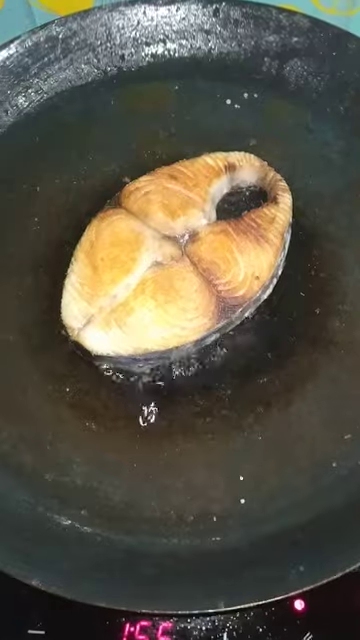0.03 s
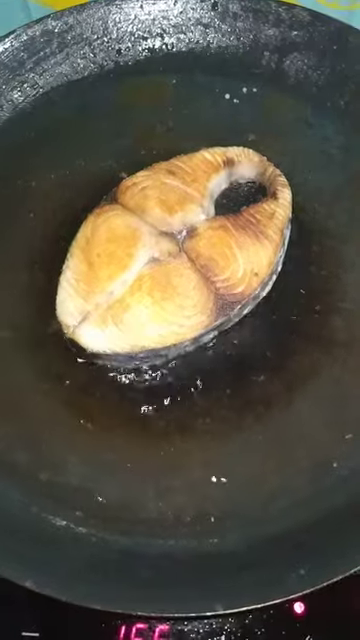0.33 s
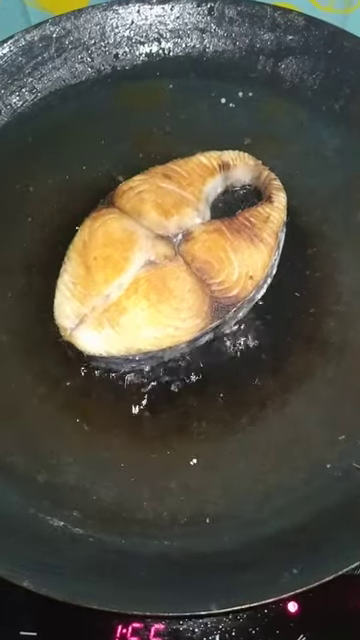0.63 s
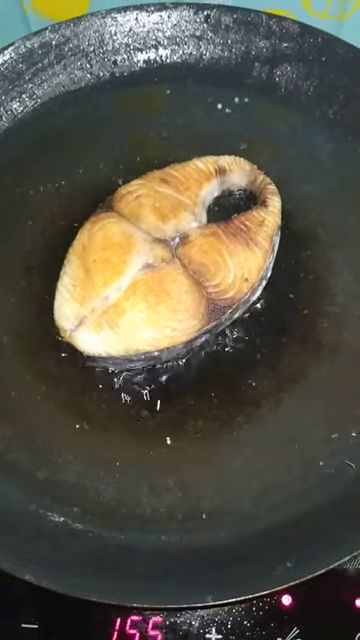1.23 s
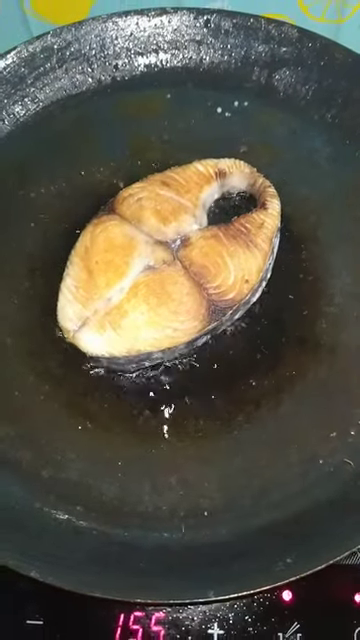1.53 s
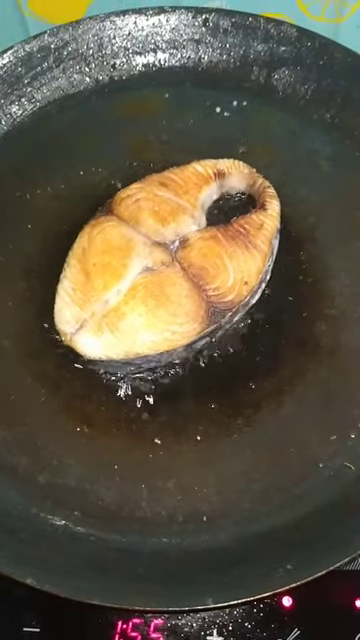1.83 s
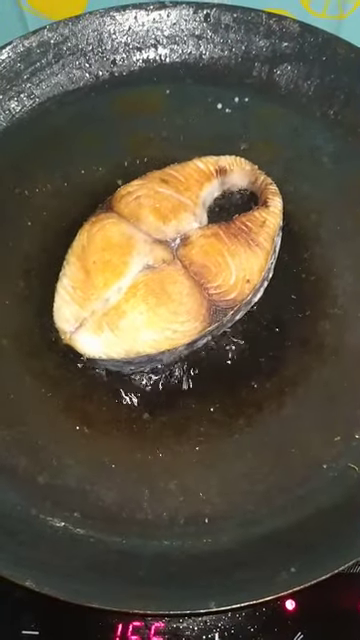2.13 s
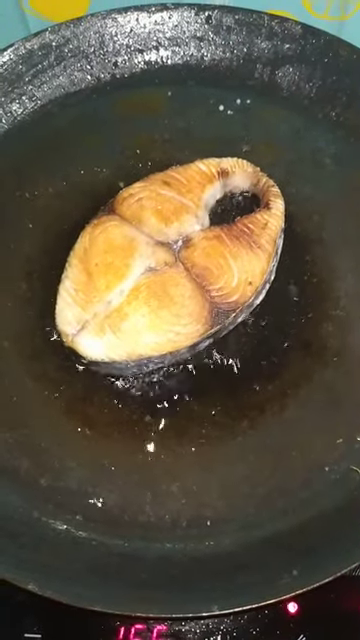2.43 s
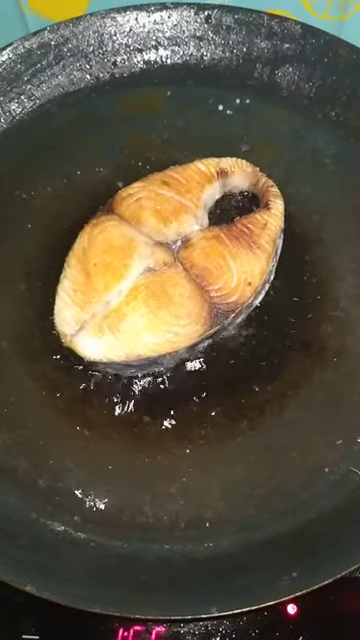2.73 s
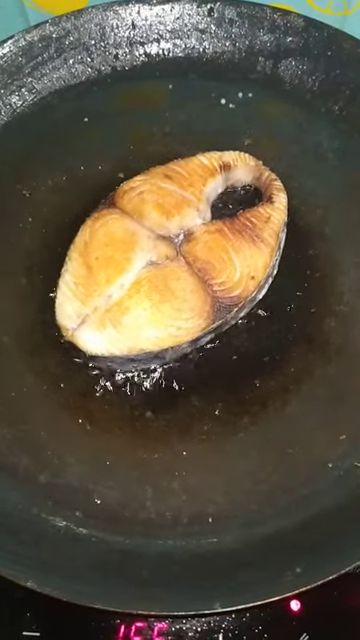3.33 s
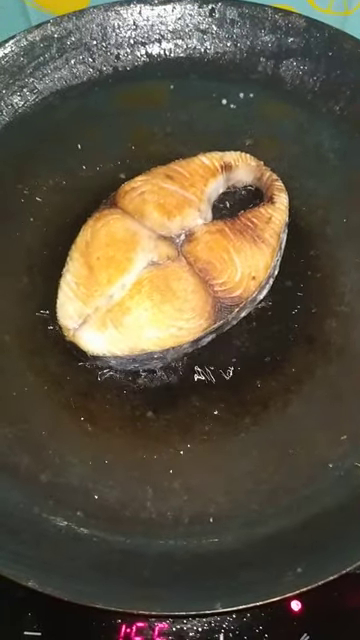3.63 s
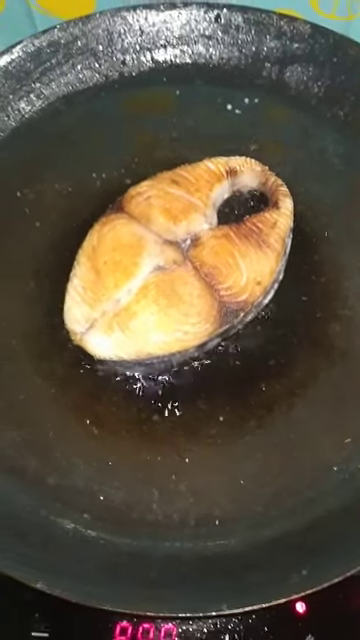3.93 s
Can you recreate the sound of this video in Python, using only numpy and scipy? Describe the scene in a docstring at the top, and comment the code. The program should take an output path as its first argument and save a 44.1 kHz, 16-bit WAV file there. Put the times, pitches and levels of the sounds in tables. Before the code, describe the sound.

Oil sizzles around a fish steak in a pan, starting with a soft microphone thump at about 0.3 seconds. The close, bright fizz continues until 4 seconds, full of sharp ticks and small spitting pops. Louder snaps with fine spray come irregularly from about 1.3 seconds, clustering near 2 and 3 seconds. Duller bubbling and a faint cooktop fan and hum lie underneath, with slight kitchen reverberation.

```python
"""Shallow oil sizzles around a fish steak in a steel pan, heard from just above.
Tiny steam bubbles burst in a dense fizz, bigger ones crack and ring as resonant cavities, blisters
snap and spray, and trapped water spits with a lower pop. Duller bubbles work under the fish.
The pan and the kitchen reflect it all, over the cooktop's fan and mains hum.
The microphone switches on with a soft thump; its two ports resonate in the treble."""
import sys
import numpy as np
from scipy import signal
from scipy.fft import rfft, irfft
from scipy.io import wavfile
from scipy.ndimage import map_coordinates

SR = 44100
rng = np.random.default_rng(int(sys.argv[2]) if len(sys.argv) > 2 else 0)


def store_pcm(level_fs):
    """Save levels as 16-bit WAV."""
    pcm = np.round(np.clip(level_fs, -1, 1) * 32767).astype(np.int16)
    wavfile.write(sys.argv[1], SR, np.atleast_2d(pcm).T)


N = 176400

FIZZ_PER_S, FIZZ_SPREAD_DB = 5000, 4.5
CLICK_S = 0.0011  # the level of a crack or snap is that of its energy spread over this time


def amp(db):
    """Decibels to amplitude ratio."""
    return 10 ** (np.asarray(db) / 20)


def unit(x):
    """Normalisation to rms 1."""
    return x / np.sqrt(np.mean(x ** 2) + 1e-20)


def along(points, hz, column=1):
    """Interpolation of a table column on a logarithmic frequency axis."""
    rows = np.array(points)
    return np.interp(np.log(hz + 1), np.log(rows[:, 0] + 1), rows[:, column])


def ears(balance_db):
    """Constant-power panning; the balance is the left level minus the right."""
    gains = np.array([[amp(balance_db)], [1]])
    return gains / np.linalg.norm(gains)


def wobble(per_s):
    """Smooth random modulation: a spline through Gaussian knots."""
    knots = rng.standard_normal(int(N * per_s / SR) + 4)
    return map_coordinates(knots, [np.arange(N) * per_s / SR])


def coloured(x, gain_db):
    """Minimum-phase filtering, at energy 1, with the spectral shape gain_db(hz)."""
    size = 4096
    cepstrum = irfft(np.log(amp(gain_db(np.fft.rfftfreq(size, 1 / SR)))))
    cepstrum[1:size // 2] *= 2  # folding makes the response causal
    cepstrum[size // 2 + 1:] = 0
    response = irfft(np.exp(rfft(cepstrum)))
    return signal.fftconvolve(x, response / np.linalg.norm(response))[:len(x)]


def add(track, s, sound):
    """Superposition of a stereo sound on the track at time s."""
    part = track[:, max(0, round(s * SR)):][:, :sound.shape[1]]
    part += sound[:, :part.shape[1]]


def ports(pair):
    """Resonance of the two microphone ports colours the bursts; each channel leaves at rms 1."""
    # port response: f/Hz, left/dB, right/dB
    response = [(407, -8.5, 0.7), (930, 1.5, 7), (1250, -8.5, -3.5), (1600, 0.2, 4.5), (2130, -3.5, -10),
                (2480, 4.5, 2.5), (3360, -1.5, -2.5), (4320, 1, 3.5), (4700, -2.5, -0.5), (5760, -4, 4.5),
                (7430, -1.5, 8.5), (8150, 1.5, 17.5), (8820, 6, 16), (10000, 6, 10), (11400, 10, 9),
                (12700, 4.5, -15), (14060, -4.5, -2.5), (15200, -7.5, -10)]
    tilt = [(40, -24.5), (500, -6), (2500, -1.5), (6000, 1)]  # tiny bursts lack bass: f/Hz, level/dB
    return np.array([unit(coloured(x, lambda hz: along(response, hz, column) + along(tilt, hz)))
                     for column, x in enumerate(pair, start=1)])


def cooktop():
    """Broadband fan noise, partly coherent between the ears, plus phase-modulated mains and blade tones."""
    # fan spectrum: f/Hz, relative level/dB
    fan = [(20, -0.5), (45, -10), (75, -10), (125, -9), (170, -4.5), (300, -6), (390, 4), (600, -4.5),
           (1200, -8), (3000, -8), (9000, -53)]
    # mains and blade tones: f/Hz, left/dB, right/dB
    hum = [(99.4, -59, -59.5), (276.7, -51, -70.5), (479, -60.5, -51), (561, -59, -55.5), (619, -56, -57.5),
           (781, -60, -78), (1220, -78, -71), (1602, -58.5, -58.5)]
    fan_db, width = -45, 0.26
    t = np.arange(N) / SR
    mid, side = (unit(coloured(x, lambda hz: along(fan, hz))) for x in rng.standard_normal((2, N)))
    out = amp(fan_db) * np.array([mid + width * side, mid - width * side])
    for hz, left_db, right_db in hum:
        waver_rad = 0.85 * hz / 400 * wobble(per_s=14)
        out += np.sqrt(2) * amp([[left_db], [right_db]]) * np.sin(2 * np.pi * hz * t + waver_rad)
    return out


def echoes(x, t60_points, patterns):
    """Diffuse reflections decay exponentially; their pattern changes as the bursts move about."""
    out = np.zeros((2, N))
    for piece in np.array_split(np.arange(N), patterns):
        hz, t, noise = signal.stft(rng.standard_normal((2, SR // 3)), SR, nperseg=128)
        decay = amp(-60 * t / along(t60_points, hz)[:, None])
        tail = signal.istft(noise * decay, SR, nperseg=128)[1]
        add(out, piece[0] / SR, signal.fftconvolve(x[:, piece], tail / np.linalg.norm(tail[0]), axes=1))
    return out


def bursts(per_s, spread_db):
    """Shot noise of rms 1; each impulse's spot in the pan sets its interaural time and level."""
    left_lag_s, lag_spread_s, balance_spread_db = 0.00026, 0.00012, 1.5
    size, delay, balance, polarity = rng.standard_normal((int(per_s * N / SR), 4)).T
    onset = rng.uniform(0, N, len(size))
    lag = SR * (left_lag_s + lag_spread_s * delay)
    height = amp(spread_db * np.minimum(size, 2.25)) * np.sign(polarity)
    lean = amp(balance_spread_db * balance / 2)
    left = np.bincount((onset + lag).astype(int) % N, height * lean, N)
    right = np.bincount(onset.astype(int) % N, height / lean, N)
    return unit(np.array([left, right]))


def boil_db(column):
    """Amplitude envelope: the level follows how hard the oil boils."""
    # strength of the boil: t/s, relative sizzle level/dB, relative bubbling level/dB
    strength = [(0.36, -20.5, -36.5), (0.48, -21, -36.5), (0.68, -19.5, -40.5), (0.76, -21.5, -44),
                (0.83, -18.5, -42), (0.89, -24.5, -36.5), (0.97, -18.5, -39.5), (1.04, -23, -39.5),
                (1.09, -21, -40), (1.16, -23, -42), (1.24, -18.5, -34.5), (1.28, -18, -34),
                (1.32, -22, -39), (1.36, -19.5, -40.5), (1.4, -27, -36.5), (1.47, -20.5, -39.5),
                (1.62, -23.5, -38), (1.82, -24, -38), (1.86, -22, -37), (2.015, -25, -42),
                (2.045, -20, -44), (2.16, -24, -35.5), (2.22, -21, -38.5), (2.32, -20.5, -39.5),
                (2.46, -23.5, -38), (2.68, -22.5, -39), (2.9, -24.5, -38.5), (3.12, -24, -37.5),
                (3.18, -20.5, -43), (3.27, -24, -38.5), (3.34, -22, -38), (3.44, -25, -42.5),
                (3.52, -20.5, -34), (3.58, -24.8, -40), (3.68, -20, -40), (3.76, -23.5, -43),
                (3.83, -21.5, -38), (4.0, -22.5, -42.5)]
    rows = np.array(strength)
    return np.interp(np.arange(N) / SR, rows[:, 0], rows[:, column])


def bubbling():
    """Bubbles under the fish make a duller shot noise, strongest in the midrange."""
    # bubbling spectrum: f/Hz, relative level/dB
    spectrum = [(100, -32), (250, -15), (400, -4), (700, -3.5), (1100, -1.5), (1650, -4.5), (2600, -1.5),
                (4500, -33.5), (9000, -29)]
    impulses = bursts(per_s=1500, spread_db=4.5)
    pair = np.array([coloured(x, lambda hz: along(spectrum, hz)) for x in impulses])
    return unit(pair) * amp(boil_db(column=2) - 3.5)


def spits():
    """Trapped water escapes as a puff of steam, coloured by the resonance of its cavity."""
    # puffs: t/s, relative level/dB, f/Hz, width/octaves, balance/dB
    puffs = [(0.384, -26.5, 3560, 0.68, -6), (0.7283, -24, 955, 1.1, -2), (0.7931, -24, 3000, 0.43, -3),
             (1.0404, -26, 4900, 0.23, -8), (1.1712, -28, 3280, 0.22, -4), (1.211, -24, 6000, 0.46, -8),
             (1.269, -29, 5000, 0.63, 0), (1.3753, -26.5, 2100, 1, -2), (1.5688, -25.5, 2820, 0.44, 1),
             (1.7158, -24.5, 5430, 0.21, 1), (1.7925, -30, 2770, 0.63, 7), (1.9541, -20, 3000, 1.2, 0),
             (2.6127, -29.5, 1680, 1.3, -8), (2.6855, -27, 2340, 0.55, 1), (2.8255, -29, 2660, 1.9, -4),
             (2.9418, -22.5, 4700, 0.16, 0), (3.0464, -20.5, 2600, 0.74, 8), (3.3241, -29.5, 4500, 1, -7),
             (3.5, -29, 5000, 0.7, -5), (3.5341, -28.5, 2170, 1.2, 2), (3.554, -24, 2730, 0.28, 2),
             (3.621, -24.5, 3300, 0.48, -1), (3.66, -35, 2500, 1.5, 0), (3.7131, -27.5, 2000, 0.99, 4),
             (3.946, -28, 3140, 0.39, 5)]
    splash = [(60, 2), (220, -2), (3500, 4), (12000, 3.5)]  # broadband floor: f/Hz, relative level/dB
    t60_s, energy_s, splash_db, gain_db = 0.022, 0.006, -17.5, 3
    out, t = np.zeros((2, N)), np.arange(SR // 10) / SR
    for s, db, pitch_hz, octaves, balance_db in puffs:
        def shape_db(hz):
            peak = np.exp(-(np.log2((hz + 1) / pitch_hz) / octaves) ** 2 / 2)
            cavity = peak * np.sqrt(pitch_hz / (hz + pitch_hz / 10))
            return 20 * np.log10(cavity + amp(splash_db + along(splash, hz)))
        steam = rng.standard_normal((2, len(t))) * amp(-60 * t / t60_s)
        puff = np.array([unit(coloured(x, shape_db)) for x in steam])
        add(out, s, amp(db + gain_db) * np.sqrt(energy_s / t[-1]) * ears(balance_db) * puff)
    return out


def snaps():
    """A blister ruptures in a broadband impulse and a brief rattle; droplets patter on the hot steel."""
    # blisters: t/s, relative level/dB, balance/dB, spray level/dB
    blisters = [(1.278, -8, 1, -26), (1.2929, -9.5, -3, -41), (1.3738, -9, -8, -23.5),
                (1.5691, -4.5, 1, -40), (1.7933, -6, 0, -29), (1.9537, -11.5, -8, -24),
                (2.0315, -6, -1, -29), (2.0535, -8.5, -3, -35), (2.1082, -10, 5, -33),
                (2.4096, -7.5, -1, -33), (2.4484, -12, -1, -26.5), (2.613, -7.5, -6, -32),
                (2.8245, -5.5, -5, -30), (2.9396, -5, -6, -31), (3.0448, -5.5, -6, -23.5),
                (3.6603, -6.5, 1, -29), (3.8047, -10.5, 8, -31)]
    # spectrum of the tearing skin: f/Hz, relative level/dB
    skin = [(1500, -2.5), (4000, -2.5), (6500, 4.5), (8400, 1.5), (11000, 2), (15000, 0)]
    rattle_t60_s, spray_t60_s, rattle_db, gain_db = 0.0075, 0.37, 2.5, -2.5
    out, spray_envelope = np.zeros((2, 2, N))
    t = np.arange(SR // 4) / SR
    for s, db, balance_db, spray_db in blisters:
        tear = rng.standard_normal((2, len(t))) * amp(-60 * t / rattle_t60_s)
        tear *= amp(rattle_db) / np.linalg.norm(tear[0])
        tear[:, 0] += 1  # the first click
        snap = ports([coloured(x, lambda hz: along(skin, hz)) for x in tear])
        add(out, s, amp(db + gain_db) * np.sqrt(CLICK_S / t[-1]) * ears(balance_db) * snap)
        add(spray_envelope, s, amp(spray_db - 60 * t / spray_t60_s) * ears(balance_db=5.5))
    return out + spray_envelope * ports(bursts(FIZZ_PER_S, FIZZ_SPREAD_DB))


def ring(pitch_hz):
    """A bursting bubble's cavity rings for a few cycles as a damped oscillator; energy 1."""
    rise_s, t60_s = 0.00024, 0.0013
    t = np.arange(SR // 100) / SR
    x = np.sin(2 * np.pi * pitch_hz * t) * (1 - np.exp(-t / rise_s)) * amp(-60 * t / t60_s)
    x[0] += 0.59  # the snap of its skin
    return x / np.linalg.norm(x)


def cracks():
    """Impulse excitation: single big bubbles burst on the right, each with a short, sharp ring."""
    # big bubbles: t/s, relative level/dB, f/Hz
    bubbles = [(0.3464, -7.5, 8900), (0.384, -8, 8100), (0.4829, -8, 9050), (0.4879, -13, 9000),
               (0.5927, -11.5, 8500), (0.628, -11.5, 8500), (0.63, -9, 7940), (0.786, -6, 8740),
               (0.7927, -6.5, 9000), (0.858, -10.5, 8600), (0.9383, -10, 8900), (0.954, -8, 8250),
               (0.988, -7.5, 8300), (1.0444, -7, 7700), (1.0747, -10, 8400), (1.1714, -9.5, 8900),
               (1.2108, -8.5, 8700), (1.266, -11, 6960), (1.2684, -7.5, 8200), (1.2817, -13, 8050),
               (1.289, -18, 8400), (1.3157, -9.5, 9200), (1.3526, -9, 8400), (1.3573, -9.5, 9400),
               (1.433, -8, 7860), (1.5105, -5, 8160), (1.615, -6.5, 8550), (1.9946, -9.5, 7400),
               (2.0895, -9, 8840), (2.2149, -6, 8400), (2.2165, -7.5, 8500), (2.3103, -8, 9200),
               (2.3473, -7, 8600), (2.4392, -9, 8600), (2.5178, -9, 8600), (2.5453, -8, 8600),
               (2.6488, -7, 8670), (2.6715, -6.5, 8600), (2.7893, -3, 8200), (2.8993, -6.5, 8700),
               (3.0438, -6, 8000), (3.081, -12.5, 8500), (3.207, -11.5, 8400), (3.3243, -5.5, 9000),
               (3.4753, -6, 9450), (3.51, -7, 8160), (3.5347, -8, 8060), (3.6644, -5, 8450),
               (3.6657, -11.5, 8000), (3.7144, -9, 7300), (3.79, -7, 8700), (3.9103, -7.5, 8500),
               (3.9498, -4.5, 9400)]
    out = np.zeros((2, N))
    for s, db, pitch_hz in bubbles:
        crack = ports([ring(pitch_hz)] * 2)
        gain = amp(db - 1) * np.sqrt(CLICK_S * SR / crack.shape[1])
        add(out, s, gain * ears(balance_db=-18.5) * crack)
    return out


def sizzle():
    """Tiny steam bursts add incoherently to a fizz; over it, small resonating bubbles tick."""
    ticks_per_s, centre_hz, range_octaves, flutter_db = 340, 8860, 0.33, 1.5
    pitches = centre_hz * 2 ** (range_octaves * np.linspace(-1, 1, 7))
    rings = np.zeros((2, N))
    for hz in pitches:
        impulses = bursts(ticks_per_s / len(pitches), spread_db=1.9)
        rings += signal.fftconvolve(impulses, ring(hz)[None], axes=1)[:, :N]
    ticks = amp(-3) * ears(balance_db=-10) * ports(rings)
    fizz = amp(-1.93) * ears(balance_db=-4.5) * ports(bursts(FIZZ_PER_S, FIZZ_SPREAD_DB))
    return (fizz + ticks) * amp(boil_db(column=1) + flutter_db * wobble(per_s=120))


def scene():
    """The direct sound of the oil and its reflections from pan and kitchen superpose on the cooktop's."""
    # reverberation time of the kitchen: f/Hz, T60/s
    kitchen_t60 = [(200, 0.28), (2000, 0.31), (8000, 0.24), (16000, 0.11)]
    pan_t60 = [(1000, 0.026)]  # the same at all frequencies
    clicks = sizzle() + cracks() + snaps()
    oil = clicks + amp(-5) * echoes(clicks, pan_t60, patterns=130) + bubbling() + spits()
    return oil + amp(-8.5) * echoes(oil, kitchen_t60, patterns=16) + cooktop()


def record(dry):
    """Switch-on transient: a falling thud as the microphone's offset settles; then clip and low-pass."""
    on_s, rise_s, settle_s, top_hz = 0.3336, 0.004, 0.048, 15900
    start_hz, end_hz, glide_s, thud_t60_s = 283, 122, 0.01, 0.076
    t = np.maximum(np.arange(N) / SR - on_s, 0)
    rise = 1 - np.exp(-(t / rise_s) ** 2)
    glide_hz = end_hz + (start_hz - end_hz) * np.exp(-t / glide_s)
    thud = amp(-22 - 60 * t / thud_t60_s) * np.sin(2 * np.pi * np.cumsum(glide_hz * (t > 0)) / SR)
    offset = amp(-20.5) * np.exp(-t / settle_s)
    thump = rise * (thud - offset) * ears(balance_db=-9)
    live = np.clip(dry * (t > 0) + thump, -1, 1)
    lowpass = signal.firwin(301, top_hz, fs=SR, window="blackman")
    return signal.fftconvolve(live, lowpass[None], "same", axes=1)


dry = scene()
out = record(dry)
store_pcm(out)
```